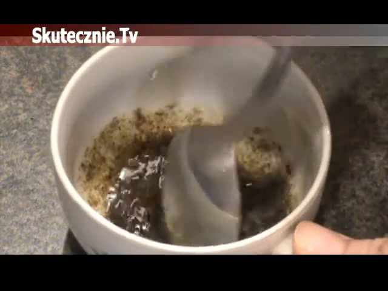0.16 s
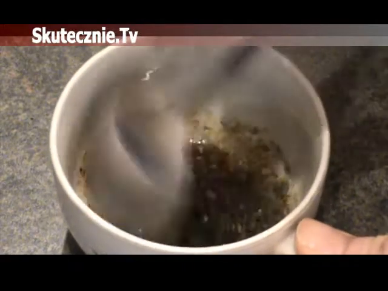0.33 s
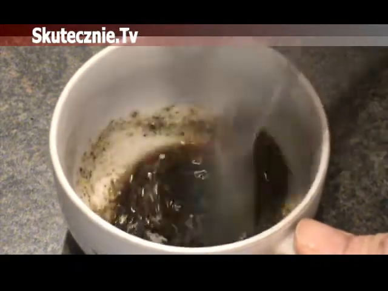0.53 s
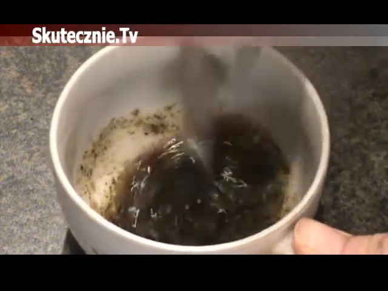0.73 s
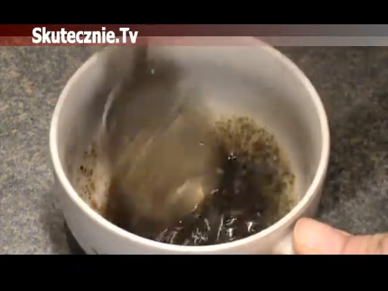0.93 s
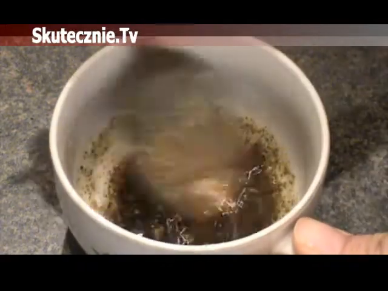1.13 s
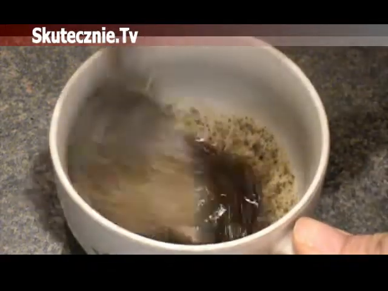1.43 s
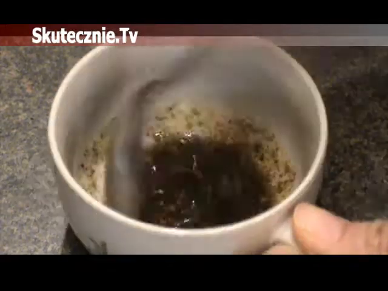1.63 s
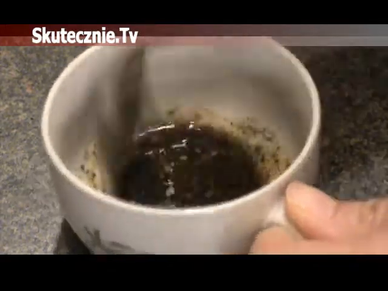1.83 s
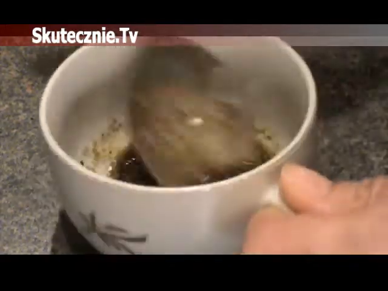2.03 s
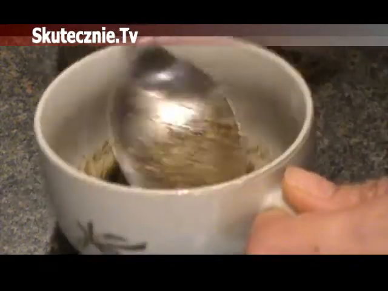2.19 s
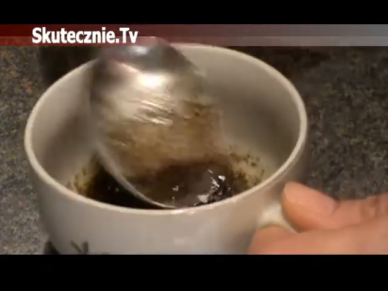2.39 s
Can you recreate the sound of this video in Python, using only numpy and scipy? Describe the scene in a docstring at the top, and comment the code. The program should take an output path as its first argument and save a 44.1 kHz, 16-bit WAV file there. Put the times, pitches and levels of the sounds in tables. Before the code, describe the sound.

Close-up stirring: a metal spoon clinks and rings against a ceramic cup, scraping lightly in a quiet kitchen

```python
"""A metal spoon stirs a little sauce in a ceramic bowl on a kitchen counter, close to a stereo microphone.
Each clink is a noise tick, a dull knock of damped body modes, and ringing sines of bowl and spoon.
Bell notes of two close sines ring along; between clinks, grit under the spoon rubs and hisses.
Filtered grains make soft bumps and narrow squeaks; kitchen reflections and steady room tone lie behind."""
import sys
import numpy as np
from scipy import signal
from scipy.fft import rfft, irfft
from scipy.io import wavfile
from scipy.ndimage import uniform_filter1d

SR = 44100
rng = np.random.default_rng(int(sys.argv[2]) if len(sys.argv) > 2 else 0)


def materialize(psi):
    """Save the field psi as 16-bit PCM at rate SR to the path in sys.argv[1].

    A 1-D psi becomes a single channel; in a 2-D psi each row is a channel.
    """
    bounded = np.clip(np.atleast_2d(psi).T, -1, 1)
    quanta = np.round(bounded * 32767).astype(np.int16)
    wavfile.write(sys.argv[1], SR, quanta)


N = 112454  # length in samples

# Levels in the tables are relative: the functions add their own offsets and random spread.
# Spoon contacts: [t/s, tick level/dB, upper ring level/dB, upper ring centre f/Hz,
#                  high ring level/dB, knock level/dB]
CONTACTS = [(0.0502, -38.5, -71, 6000, -46.5, -36.5), (0.1355, -34, -74, 5460, -53, -62),
            (0.225, -1, -25.5, 5675, -17, -34.5), (0.2811, -10, -31.5, 5720, -31, -40),
            (0.3354, -35, -47, 5930, -39.5, -38), (0.6025, -8, -55, 6100, -34.5, -27.5),
            (0.612, -2, -14, 5680, -18, -38), (0.7041, -51, -53, 5900, -37, -32.5),
            (0.7402, -0.5, -22, 5973, -27, -26.5), (0.749, -5.5, -32, 6150, -21.5, -19),
            (0.9112, -45, -50.5, 6150, -78, -41), (1.0, -20, -47, 6100, -47.5, -41.5),
            (1.099, -30, -62, 5770, -51, -62), (1.1286, -11.5, -46, 5440, -47, -39.5),
            (1.1874, -3, -30, 5570, -30, -45), (1.1935, -2, -28.5, 5590, -27.5, -29.5),
            (1.3721, -3, -26, 5480, -24, -33), (1.6811, -5, -31, 5554, -26.5, -37),
            (1.6893, -30, -50.5, 5470, -46, -43), (1.7714, -21, -42, 5970, -38, -54),
            (1.9006, -9.5, -22.5, 5770, -18, -31.5), (1.93, -9.5, -32, 5770, -35, -36.5),
            (2.0319, -13.5, -40.5, 5820, -49.5, -53)]
# Upper rings of bowl and spoon: [f/Hz, t60/s]
UPPER_RINGS = [(5435, 0.15), (5485, 0.2), (5575, 0.18), (5660, 0.047), (5752, 0.17), (5805, 0.081),
               (5850, 0.038), (6000, 0.021)]
# Other, mostly higher modes of bowl and spoon: [f/Hz, level/dB, t60/s]
HIGH_RINGS = [(2174, -17, 0.25), (2562, -18.5, 0.064), (2900, -32, 0.02), (3540, -20.5, 0.056),
              (3740, -29.5, 0.18), (4605, -28, 0.27), (6256, -23, 0.047), (7360, -24, 0.25),
              (7570, -16.5, 0.14), (8210, -24, 0.12), (9080, -19, 0.032), (10790, -15, 0.12),
              (11480, -14, 0.079), (13060, -16.5, 0.038)]
# Damped modes of the bowl on the counter: [f/Hz, level/dB, t60/s]
BODY_MODES = [(301.2, -7, 0.076), (345, -0.5, 0.045), (458, 1, 0.047), (648.4, -0.5, 0.029),
              (775, -2, 0.048), (913, -1.5, 0.0088), (1283.4, -10, 0.063), (1380, 8, 0.019),
              (1861, -3.5, 0.036)]
# Spectrum of tick, splash and scrape hiss: [f/Hz, level/dB]
CONTACT_SPECTRUM = [(180, -27.5), (300, -0.5), (5800, 2.5), (8220, -2.5), (9240, -3), (11900, -2.5),
                    (14000, -48), (15000, -23), (16000, -29)]
# Bell notes, the first already faintly sounding at the start: [t/s, note level/dB, note t60/s,
#     twin level/dB, twin t60/s, time of a level step t/s, level change after it/dB]
BELL_NOTES = [(0, -43, 1, -49, 0.33, 0.44, -16.5), (.2265, -10.5, 0.5, -46, 0.049, 0.31, -3.5),
              (.612, -19.5, 0.43, -20, 0.95, 0.67, -14), (.7495, -24.5, 0.57, -27, 0.27, .993, -3),
              (1.188, -31, 0.5, -43, 0.21, 1.29, 4.5), (1.372, -59, 0.2, -32.5, 0.38, 1.36, -28),
              (1.682, -28, 0.82, -48, 0.042, 1.714, -6.5), (1.901, -21.5, 0.17, -8.5, 0.11, 1.922, -16.5),
              (2.033, -50.5, 0.81, -20.5, 0.028, 2.2, 3.5)]
# Scrape between clinks: [t/s, low rub level/dB, middle rub level/dB, hiss level/dB]
SCRAPE_LEVELS = [(0.0, -44.5, -51.5, -50.5), (0.13, -49, -53.5, -63.5), (0.215, -56, -62, -80),
                 (0.3, -48, -75, -56), (0.4, -59, -67, -51.5), (0.5, -46, -49.5, -55.5),
                 (0.559, -60, -48.5, -55.5), (0.658, -52, -44.5, -32.5), (0.7, -39, -52, -49),
                 (0.82, -54, -43.5, -56.5), (0.95, -54.5, -81, -63), (1.059, -66, -66, -68),
                 (1.14, -61, -49.5, -48.5), (1.32, -50, -54, -49.5), (1.479, -52.5, -57, -50),
                 (1.56, -60, -69.5, -74.5), (1.739, -62.5, -57, -47), (1.85, -63, -60, -70),
                 (1.899, -52, -54, -38.5), (2.02, -63, -71, -59.5), (2.13, -50.5, -55, -54.5),
                 (2.29, -65.5, -68, -87), (2.401, -71.5, -71, -73)]
# Dull bumps of bowl and sauce: [t/s, level/dB, length/s, f/Hz]
BOWL_BUMPS = [(.047, -34.5, 0.029, 650), (.33, -49, 0.022, 544), (.43, -44.5, 0.028, 287),
              (.48, -45, 0.013, 332), (.51, -39, 0.094, 690), (.655, -40.5, 0.022, 347),
              (.77, -40.5, 0.036, 404), (1.21, -37, 0.033, 583), (1.78, -40.5, 0.018, 333),
              (1.81, -38, 0.008, 366), (1.93, -33.5, 0.032, 351), (2.095, -41, 0.043, 314),
              (2.118, -36.5, 0.024, 337), (2.145, -43.5, 0.039, 313), (2.2355, -44, 0.017, 378),
              (2.253, -43.5, 0.011, 405)]
# Skids of the spoon's edge, each ringing one narrow band: [t/s, level/dB, length/s, f/Hz]
EDGE_SQUEAKS = [(.336, -40.5, 0.017, 4060), (.51, -31.5, 0.026, 1410), (.56, -36.5, 0.072, 1340),
                (.605, -22, 0.025, 3200), (.995, -38.5, 0.0035, 2670), (1.0, -41, 0.015, 1834),
                (1.06, -47, 0.046, 2690), (1.127, -49, 0.0083, 2600), (1.372, -36, 0.033, 4160),
                (1.41, -41, 0.031, 2460), (1.81, -46, 0.014, 1470), (1.935, -37, 0.015, 1610),
                (2.035, -39, 0.013, 1410), (2.11, -53, .06, 1306)]
# Decay of the kitchen's reflections: [f/Hz, t60/s]
KITCHEN_DECAY = [(250, 0.14), (1000, 0.27), (2300, 0.26), (5000, 0.22), (12000, 0.16)]
# Spectrum of the room tone: [f/Hz, level per Hz/dB]
ROOM_SPECTRUM = [(15, -42), (25, -12), (64, -31.5), (99, 0.5), (123, -6), (195, -7), (301, -23), (962, -21),
                 (1040, -16), (2000, -26.5), (2840, -24), (4490, -31.5), (16000, -35)]

TICK_T60_S, TICK_OFFSET_DB, KNOCK_OFFSET_DB = 0.011, -11, -5.0
UPPER_REACH_HZ = 170  # how far from the centre upper rings are excited
HIGH_DETUNE, HIGH_SPREAD_DB, KNOCK_SPREAD_DB = 0.014, 2.5, 4.93  # relative pitch spread, level spreads
SPLASH_DB, SPLASH_T60_S = -11.5, 0.13
RISE_S, FLASH, FLASH_S = 0.0012, 1.5, 0.0029  # onset of the rings, their early extra strength and its decay
CHATTER_DB, CHATTER_S = -12, 0.01
FLUTTER_DEPTH = 1.8
BELL_HZ, TWIN_HZ, TWIN_TURN = 2266, 2302, 0.6  # phase in turns
BELL_RISE_S, STEP_S = 0.0073, 0.0029
CHANNEL_TURN, BELL_RIGHT_DB = 0.07, 1.47  # phase offset in turns, extra level on the right
GRIT_PER_S, GRIT_DB = 780, 0.5
GRAINS_PER_S, KICK_S = 500, 0.012
RIGHT_DB = 1.73  # right channel of all near sounds
WET_DB, BELL_WET, WIDTH = -2, 0.3, 0.84  # reverb level, bell's share in it, weight of unshared reflections
TONE_DB, TONE_SHARED = -54.5, 0.78  # level, correlation of the channels
CEILING, EDGE_HZ = 0.38, 15900  # level towards which peaks are rounded, band limit


def clinks():
    """Contact noise, struck modes of bowl, spoon and counter; the spoon chatters on briefly."""
    out, t = np.zeros(N), np.arange(SR // 4) / SR
    for s, tick_db, upper_db, centre_hz, high_db, knock_db in CONTACTS:
        onset = np.minimum(t / RISE_S, 1) * (1 + FLASH * np.exp(-t / FLASH_S))
        rings = upper_rings(t, upper_db, centre_hz) + high_rings(t, high_db) + splash(t, high_db)
        clink = tick(t, tick_db) + rings * onset + knock(t, knock_db)
        add(out, s, signal.fftconvolve(clink, chatter(t[:1500])))
    return signal.sosfilt(signal.butter(3, 260, "high", fs=SR, output="sos"), out)


def tick(t, db):
    """Sharp contact: coloured noise with a 0.2 ms rise and a fast decay."""
    noise = evened(coloured(rng.standard_normal(len(t)), CONTACT_SPECTRUM))
    return noise * amp(db + TICK_OFFSET_DB - 60 * t / TICK_T60_S) * np.minimum(t / 0.0002, 1)


def upper_rings(t, db, centre_hz):
    """Modes share the energy by how near they lie to the struck spot's pitch."""
    hz, t60 = np.transpose(UPPER_RINGS)
    share = np.exp(-((hz - centre_hz) / UPPER_REACH_HZ) ** 2) + 0.05
    share = share / np.linalg.norm(share)
    out = np.zeros(len(t))
    for gain, f, decay in zip(share, hz, t60):
        out += gain * ring(t, f, db, decay, rng.random()) * flutter(t, hz=160)
    return out


def high_rings(t, db):
    """Each mode sounds as two sines, independently detuned and fluttering."""
    out = np.zeros(len(t))
    for hz, mode_db, t60 in HIGH_RINGS + HIGH_RINGS:
        pitch = hz * (1 + HIGH_DETUNE * rng.standard_normal())
        level = db + mode_db + HIGH_SPREAD_DB * rng.standard_normal()
        out += ring(t, pitch, level, t60) * flutter(t, hz=232)
    return out


def splash(t, db):
    """Fluttering, dying noise that follows the level of the high rings."""
    noise = evened(coloured(rng.standard_normal(len(t)), CONTACT_SPECTRUM))
    return noise * amp(db + SPLASH_DB - 60 * t / SPLASH_T60_S) * flutter(t, hz=120)


def knock(t, db):
    """Damped modes of bowl on counter, varied in pitch, level and sign at each contact."""
    out = np.zeros(len(t))
    for hz, mode_db, t60 in BODY_MODES:
        pitch = hz * rng.uniform(0.943, 1.05)
        level = db + mode_db + KNOCK_OFFSET_DB + KNOCK_SPREAD_DB * rng.standard_normal()
        out += ring(t, pitch, level, t60) * rng.choice([-1, 1])
    return out


def chatter(t):
    """Impulses of the chattering spoon: the contact, then sparse weaker ones, at unit total energy."""
    sparse = rng.standard_normal(len(t)) * (rng.random(len(t)) < 0.012)
    impulses = amp(CHATTER_DB) * np.exp(-t / CHATTER_S) * sparse
    impulses[0] = 1
    return impulses / np.linalg.norm(impulses)


def flutter(t, hz):
    """Unsteady strength: random changes, hz of them a second, roughen the rings."""
    return evened(1 + FLUTTER_DEPTH * np.interp(t * hz, np.arange(100), rng.standard_normal(100)))


def bell():
    """A clear bell note near 2.27 kHz and its slightly higher twin beat, out of step in the two channels."""
    out, t = np.zeros((2, N)), np.arange(SR) / SR
    for s, bell_db, t60, twin_db, twin_t60, step_s, change_db in BELL_NOTES:
        since_step = np.maximum(t + s - step_s, 0)
        level_step = amp(change_db) + (1 - amp(change_db)) * np.exp(-since_step / STEP_S)
        shape = (1 - np.exp(-t / BELL_RISE_S)) * level_step
        for k in range(2):  # left, right
            note = ring(t, BELL_HZ, bell_db, t60, -k * CHANNEL_TURN)
            twin = ring(t, TWIN_HZ, twin_db, twin_t60, TWIN_TURN + k * CHANNEL_TURN)
            add(out[k], s, amp(k * BELL_RIGHT_DB) * shape * (note + twin))
    return out


def scrape():
    """Grit under the spoon: uneven clicks shake the body modes and roughen a hiss."""
    s, low_db, mid_db, hiss_db = np.transpose(SCRAPE_LEVELS)
    t, now = np.arange(4000) / SR, np.arange(N) / SR
    rub = [signal.oaconvolve(grit(), ring(t, hz, db, t60))[:N] for hz, db, t60 in BODY_MODES]
    density = evened(uniform_filter1d(abs(grit()), 60))
    hiss = coloured(rng.standard_normal(N) * (1 + 0.24 * density), CONTACT_SPECTRUM)
    hiss = signal.sosfilt(signal.butter(2, 2200, "high", fs=SR, output="sos"), hiss)
    parts = zip((sum(rub[:5]), sum(rub[5:]), hiss), (low_db, mid_db, hiss_db))
    return sum(evened(x) * amp(np.interp(now, s, db, right=-90)) for x, db in parts)


def grit():
    """Clicks at random times, of random sign and slightly uneven strength."""
    strength = amp(GRIT_DB * np.minimum(rng.exponential(1, N), 3))
    return strength * (rng.random(N) < GRIT_PER_S / SR) * rng.choice([-1, 1], N)


def bumps():
    """Bowl and sauce bump dully: a firm nudge and grains through a broad resonance."""
    return rubs(BOWL_BUMPS, 0.26, 1.4)


def squeaks():
    """The spoon's edge skids: a light nudge and grains through a narrow resonance."""
    return rubs(EDGE_SQUEAKS, 0.047, 0.28)


def rubs(rows, width, kick):
    """A first nudge, then a short swell of grains, through one resonance of relative half-width."""
    out, t = np.zeros(N), np.arange(SR // 5) / SR
    for s, db, length, hz in rows:
        band = signal.butter(2, [hz * (1 - width), hz * (1 + width)], "band", fs=SR, output="sos")
        sparse = rng.random(len(t)) < GRAINS_PER_S / SR
        grains = rng.standard_normal(len(t)) * sparse * np.sqrt(SR / GRAINS_PER_S)
        grains[0] = kick * np.sqrt(SR * KICK_S)
        swell = (0.5 + 2 * t / length) * np.exp(-2 * t / length)
        swell = swell * np.sqrt(SR / (4 * width * hz))  # makes up for the narrow band
        add(out, s, amp(db) * signal.sosfilt(band, grains * swell))
    return out


def kitchen(x):
    """Sparse reflections of random sign, partly shared by both channels, each band dying at its own speed."""
    taps = np.zeros((3, SR))  # left, right, shared
    at = np.arange(120, SR - 20, 20) + rng.integers(0, 20, (3, (SR - 121) // 20))
    np.put_along_axis(taps, at, rng.choice([-1., 1.], at.shape), 1)
    hz, t, bands = signal.stft(taps[2] + WIDTH * taps[:2], SR, nperseg=256)
    decay = amp(-60 * t / read(KITCHEN_DECAY, hz)[:, None])
    tail = signal.istft(bands * decay, SR, nperseg=256)[1]
    return signal.fftconvolve(x[None], tail / np.linalg.norm(tail[0]), axes=1)[:, :N]


def room_tone():
    """Steady hum and hiss of the room: coloured noise, partly the same in both channels."""
    left, other = rng.standard_normal((2, N))
    right = TONE_SHARED * left + np.sqrt(1 - TONE_SHARED ** 2) * other
    return amp(TONE_DB) * evened(coloured(np.array([left, right]), ROOM_SPECTRUM))


def amp(db):
    """Decibels to amplitude."""
    return 10 ** (np.asarray(db) / 20)


def evened(x):
    """Scales x to an RMS of one."""
    return x / np.sqrt(np.mean(x ** 2) + 1e-20)


def read(points, hz):
    """Reads a curve between its points on a log frequency axis."""
    f, value = np.transpose(points)
    return np.interp(np.log(hz + 1), np.log(f + 1), value)


def add(mix, s, sound):
    """Lays a sound into the mix from s seconds on."""
    part = mix[round(s * SR):][:len(sound)]
    part += sound[:len(part)]


def coloured(x, points):
    """Shapes x by a spectrum in dB."""
    return irfft(rfft(x) * amp(read(points, np.fft.rfftfreq(x.shape[-1], 1 / SR))), x.shape[-1])


def ring(t, hz, db, t60, turn=0):
    """A dying sine; db is its RMS level at the start."""
    return np.sqrt(2) * amp(db - 60 * t / t60) * np.sin(2 * np.pi * (hz * t + turn))


def scene():
    """Bowl and spoon close up, their kitchen reflections, and the room tone."""
    ringing = bell()
    rest = clinks() + scrape() + bumps() + squeaks()
    near = (ringing + rest) * amp([[0], [RIGHT_DB]])
    reflections = amp(WET_DB) * kitchen(rest + BELL_WET * ringing[0])
    return near + reflections + room_tone()


def record(dry):
    """The top above about 13 kHz is dulled and loud peaks are softly rounded; then the band limit."""
    dull = coloured(dry, [(12800, -1.5), (13600, -10.5), (16000, -3)])  # (f/Hz, level/dB)
    rounded = CEILING * np.tanh(dull / CEILING)
    lowpass = signal.firwin(511, EDGE_HZ, window=("kaiser", 9), fs=SR)
    return signal.oaconvolve(rounded, lowpass[None], "same")


dry = scene()
out = record(dry)
materialize(out)
```